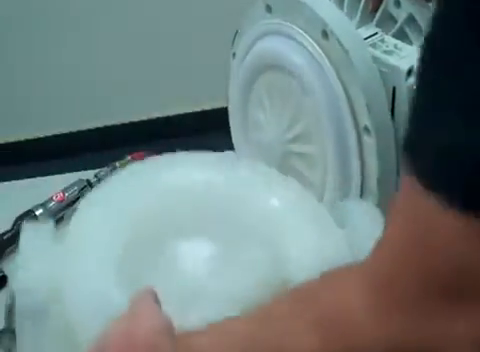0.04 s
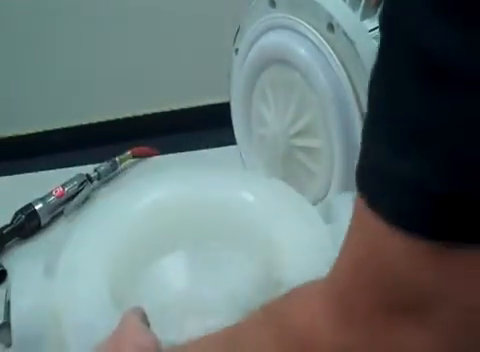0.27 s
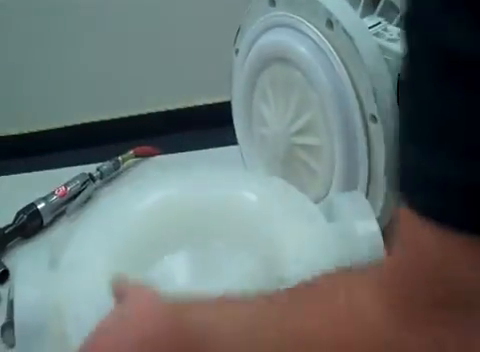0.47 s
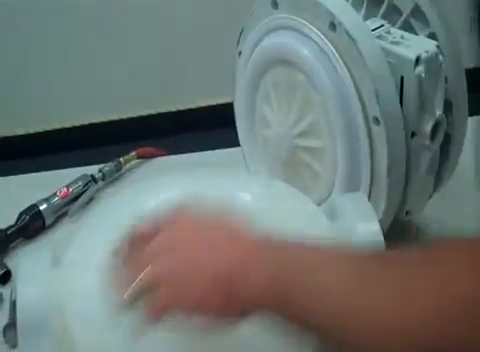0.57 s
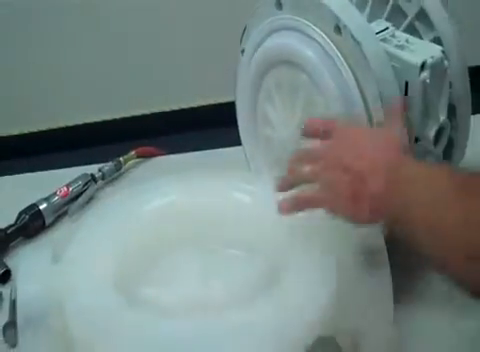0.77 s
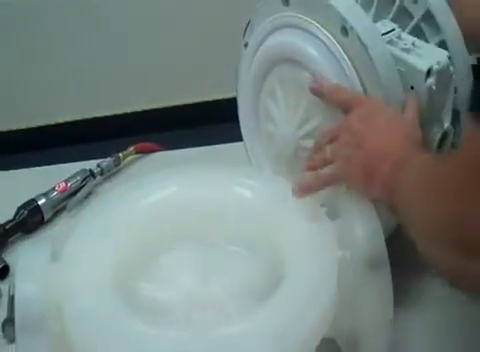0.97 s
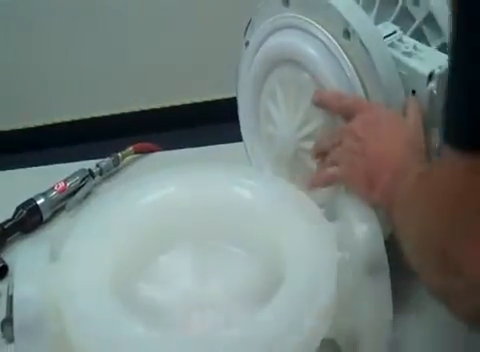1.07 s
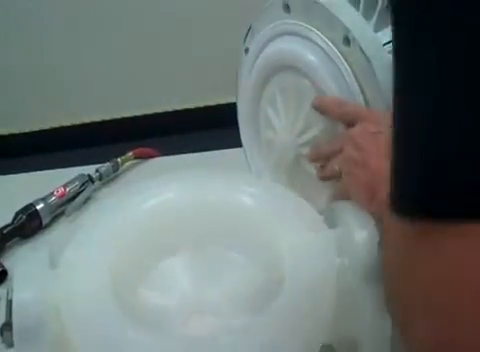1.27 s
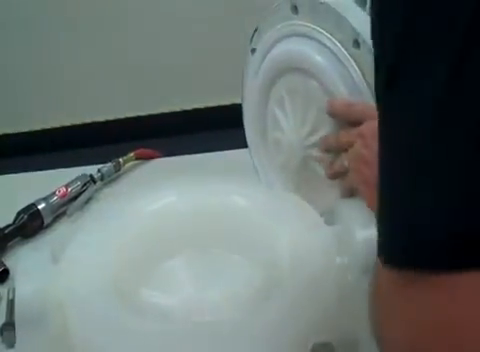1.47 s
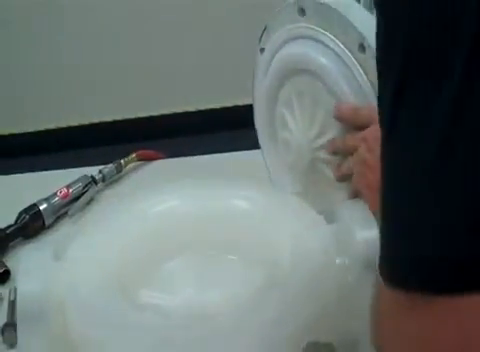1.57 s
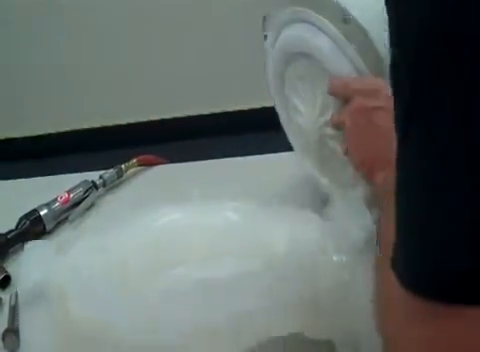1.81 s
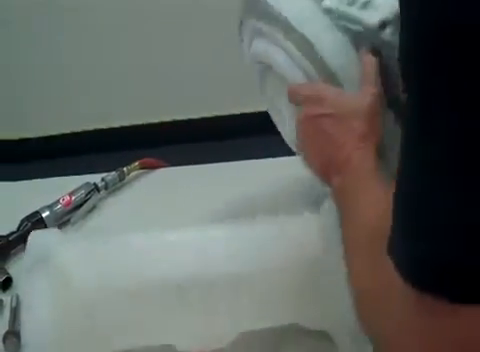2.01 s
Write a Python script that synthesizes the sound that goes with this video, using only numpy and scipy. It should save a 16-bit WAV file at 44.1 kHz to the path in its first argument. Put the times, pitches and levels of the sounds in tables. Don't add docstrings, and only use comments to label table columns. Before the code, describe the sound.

Loud clattering bang of a hard plastic housing landing on a bench, then faint handling taps

```python
import sys
import numpy as np
from scipy import signal
from scipy.fft import rfft, irfft
from scipy.io import wavfile
from scipy.ndimage import uniform_filter1d

SR = 44100
rng = np.random.default_rng(int(sys.argv[2]) if len(sys.argv) > 2 else 0)


def nominal_scale(level):
    x = np.asarray(level, float) / 20
    return 10 ** x


def dump_mix(stems):
    frames = np.atleast_2d(stems).T
    limited = np.clip(frames, -1, 1)
    pcm = np.round(limited * 32767).astype(np.int16)
    wavfile.write(sys.argv[1], SR, pcm)


N = 90404
LEAD = 4410
BLOW_PAN_DB, AIR_PAN_DB = 4.5, 4

# [f/Hz, level per Hz/dB]
BLOW_SPECTRUM = [(30, -19), (120, -11), (500, -3.5), (1900, -1.5), (4000, -9), (8000, -24.5), (13500, -41),
                 (16000, -51.5)]
# [f/Hz, level per Hz/dB]
RUB_SPECTRUM = [(150, -19), (500, 3.5), (1000, 0.5), (1600, 0.5), (3000, -5), (5000, -12), (5800, -21.5),
                (10500, -32), (13000, -54.5)]


def evened(x):
    return x / np.sqrt(np.mean(x ** 2) + 1e-20)


def read(points, hz):
    f, value = np.transpose(points)
    return np.interp(np.log(hz + 1), np.log(f + 1), value)


def add(mix, s, sound):
    part = mix[..., round(s * SR) + LEAD:][..., :sound.shape[-1]]
    part += sound[..., :part.shape[-1]]


def colour(points, tilt_db):
    hz = abs(np.fft.fftfreq(4096, 1 / SR))
    log_gain = np.log(nominal_scale(read(points, hz) + tilt_db * np.log2((hz + 400) / 1400)))
    response = np.fft.ifft(np.exp(np.conj(signal.hilbert(log_gain)))).real[:2048]
    return response / np.linalg.norm(response)


def ring(modes, stretch):
    t = np.arange(SR // 2) / SR
    total = np.zeros(len(t))
    for hz, db, t60 in modes:
        fade = nominal_scale(db - 60 * t / (t60 * stretch))
        total += fade * np.sin(2 * np.pi * hz * t + rng.uniform(0, 2 * np.pi))
    return total


def flutter(x, span):
    wobble = uniform_filter1d(rng.standard_normal(x.shape), span)
    return x * (0.7 + 0.7 * evened(uniform_filter1d(wobble, span)))


def burst(grit, contact, rise):
    u = np.arange(len(grit)) / SR / contact
    push = grit * np.minimum(u / rise, 1) * np.exp(-2 * u)
    return push / np.linalg.norm(push) * 10


def pair(frames, hz, same):
    a, b, c, d = rng.standard_normal((frames, len(hz), 4)).T
    alike = np.clip(read(same, hz), -1, 1)[:, None]
    left, other = a + 1j * b, c + 1j * d
    return np.array([left, alike * left + np.sqrt(1 - alike ** 2) * other])


def panned(x, pan_db):
    return x * nominal_scale(np.array([[pan_db / 2], [-pan_db / 2]]))


def air():
    # [f/Hz, level per Hz/dB]
    air_spectrum = [(20, -9), (100, -11), (250, -2.5), (500, -4), (1500, -11.5), (5000, -13.5), (9000, -22),
                    (12500, -33.5), (15000, -52)]
    # [f/Hz, likeness 0-1]
    air_same = [(60, 1), (240, 1), (940, 0.84), (3710, 0.26), (14700, 0.15)]
    air_db, patchy_db, swell_db = -57, -1.5, -1.4
    frames, hz = N // 256 + 8, np.fft.rfftfreq(1024, 1 / SR)
    patches = uniform_filter1d(rng.standard_normal((frames, 513)), 12, 0)
    patches = evened(uniform_filter1d(patches, 14, 1)).T
    swell = evened(uniform_filter1d(rng.standard_normal(frames), 20))
    gain_db = read(air_spectrum, hz)[:, None] + patchy_db * patches + swell_db * swell
    z = pair(frames, hz, air_same) * nominal_scale(gain_db)
    hiss = signal.istft(z, nperseg=1024, noverlap=768)[1][:, :N]
    return panned(nominal_scale(air_db) * evened(hiss), AIR_PAN_DB)


def machine():
    # [f/Hz, level/dB]
    hum_tones = [(58.5, -5.5), (118, -2.5), (173, -7.5), (361, -7)]
    # [f/Hz, level per Hz/dB]
    rumble_spectrum = [(15, -2.5), (40, -4.5), (130, -8), (250, -14.5), (500, -38.5)]
    # [t/s, level/dB]
    load = [
        (0, -73),
        (.3, -73.5),
        (.93, -66.5),
        (.99, -55),
        (1.36, -58.5),
        (1.42, -56.5),
        (1.82, -61.5),
        (1.88, -56),
        (2.05, -59.5),
    ]
    hum_db, rumble_db = -4.0, -4.5
    t = np.arange(N) / SR
    hum = evened(sum(nominal_scale(db) * np.sin(2 * np.pi * (hz * t + rng.random())) for hz, db in hum_tones))
    rumble = evened(signal.fftconvolve(rng.standard_normal(N), colour(rumble_spectrum, 0))[:N])
    strength = nominal_scale(np.interp(t, *np.transpose(load)))
    return panned(strength * (nominal_scale(hum_db) * hum + nominal_scale(rumble_db) * rumble), AIR_PAN_DB)


def room(x, stretch=1):
    # [f/Hz, t60/s]
    room_t60 = [(40, 0.17), (90, 0.25), (210, 0.46), (560, 0.28), (1470, 0.24), (3880, 0.21), (8000, 0.15),
                (12000, 0.065)]
    # [f/Hz, likeness 0-1]
    room_same = [(60, 0.94), (500, 0.94), (1600, 0.86), (4000, 0.35), (8000, 0.14), (14000, 0.37)]
    late_db, late_stretch = -23.5, 3.26
    hz, t = np.fft.rfftfreq(256, 1 / SR), np.arange(900) * 64 / SR
    fall_db = -60 * t / read(room_t60, hz)[:, None] / stretch
    fall = nominal_scale(fall_db) + nominal_scale(late_db + fall_db / late_stretch)
    tail = signal.istft(pair(len(t), hz, room_same) * fall, nperseg=256, noverlap=192)[1]
    tail = tail * np.clip(np.arange(tail.shape[1]) / SR / 0.0037, 0, 1)
    return signal.fftconvolve(x, tail / np.linalg.norm(tail[0]), axes=1)[:, :x.shape[1]]


def thud():
    # [f/Hz, level per Hz/dB]
    thud_spectrum = [(40, -12.5), (200, -2), (500, -1.5), (900, -2.5), (1800, -15.5), (4500, -30.5),
                     (11000, -43.5)]
    # [f/Hz, level/dB, t60/s]
    thud_ring = [(125, -41.5, 0.27), (199.6, -38, 0.48), (321, -33.5, .3), (485, -28.5, 1),
                 (516, -36.5, .45), (585.3, -35, 0.39), (884.4, -36.5, 0.12), (1140, -35, 0.4)]
    thud_s, thud_db, contact_s = -0.074, -11, 0.033
    rock_hz, octaves_per_s, rock_db, rock_t60_s = 316, 9, -34, 0.3
    out, hum = np.zeros((2, N + LEAD))
    push = burst(rng.standard_normal(4000), contact_s, 0.069)
    add(out, thud_s, nominal_scale(thud_db) * signal.fftconvolve(push, colour(thud_spectrum, 3.3)))
    t = np.arange(SR // 4) / SR
    cycles = np.cumsum(rock_hz * 2 ** (-octaves_per_s * t)) / SR
    rock = nominal_scale(rock_db - 60 * t / rock_t60_s) * np.sin(2 * np.pi * cycles)
    add(hum, 0, flutter(rock, span=300))
    add(hum, 0, flutter(ring(thud_ring, 0.87), span=400))
    return room(panned(out, BLOW_PAN_DB), stretch=1.4) + panned(hum, BLOW_PAN_DB)


def slides():
    # [start t/s, length/s, level/dB, brightness per octave/dB]
    strokes = [(0.8138, 0.047, -55.5, 6), (0.8523, 0.046, -54, 2), (0.8945, 0.028, -54, 1),
               (1.053, 0.049, -55, 5.5), (1.2427, 0.12, -62.5, 2.5), (1.4172, 0.026, -52.5, 4.5),
               (1.492, 0.033, -57, -5), (1.5382, 0.051, -45, 1), (1.537, .03, -58, 11),
               (1.574, 0.037, -62, -1.5), (1.5993, 0.063, -50.5, -0.5), (1.6518, 0.058, -60.5, -16),
               (1.8472, 0.059, -65.5, 6.5), (0.9716, 0.1, -66.5, -11.5), (1.4697, 0.14, -56, -22),
               (0.7785, 0.1, -63.5, -18.5), (0.0196, 0.11, -61.5, 12.5), (0.0913, 0.11, -60, 11.5),
               (1.76, 0.091, -67, 3)]
    # [f/Hz, width/Hz, level/dB]
    shell_modes = [(695, 60, -4), (980, 31, -3.5), (1320, 30, 0.5), (1650, 55, 3.5), (1870, 91, 3),
                   (2620, 60, 0), (3000, 120, -5.5), (4550, 100, -10.5)]
    slips_per_s, slip_spread_db, shell_db, pan_db = 6700, 1, -0.5, 6.5
    shell = ring([(hz, db, 1.6 / wide) for hz, wide, db in shell_modes], 1)[:8000]
    shell = nominal_scale(shell_db) * shell / np.linalg.norm(shell)
    chance = rng.random((len(strokes), 3, 6000))
    for_all = np.zeros((2, N + LEAD))
    for (s, length, db, tilt_db), (when, size, sign) in zip(strokes, chance):
        u = np.arange(6000) / SR / length
        slip_size = nominal_scale(-slip_spread_db * np.log(size + 0.0067))
        slips = (when < slips_per_s / SR) * slip_size * np.sign(sign - 0.5)
        slips = evened(slips) * np.sin(np.pi * np.minimum(u, 1) ** 0.7)
        sides = np.array([slips, slips + 0.5 * np.roll(slips, 37)])
        rub = signal.fftconvolve(sides, colour(RUB_SPECTRUM, tilt_db)[None], axes=1)
        hollow = signal.fftconvolve(sides, shell[None], axes=1)
        add(for_all, s, nominal_scale(db) * panned(rub, pan_db))
        add(for_all, s, nominal_scale(db) * panned(hollow, pan_db))
    return for_all


def taps():
    # [t/s, peak level/dB, ping f/Hz, ping share/dB, brightness per octave/dB]
    touches = [(0.4997, -43, 6095, -9, 3.5), (0.676, -56.5, 2095, 11, -1), (0.7296, -53.5, 7455, -16, 11),
               (0.818, -53, 3080, 5, 8), (.9393, -42.5, 3214, -5, 8.5), (1.15, -55.5, 1520, 0, 2),
               (1.262, -51.5, 2210, -2, 7), (1.3016, -55, 4100, 8, 12.5), (1.3228, -45, 3220, 6.5, 7.5),
               (1.3444, -57, 4230, -1, 7), (1.3628, -49, 4130, 2, 7), (1.4146, -38, 1914, -11, 3),
               (1.415, -43, 4105, 3, 5), (1.491, -54, 189, 13, -15), (1.4948, -42.5, 2040, 4, 0),
               (1.5394, -49.5, 4300, 9, 7.5), (1.575, -60, 4500, -12, 17.5), (1.6116, -51, 1650, 8, -2),
               (1.7404, -56.5, 1920, 1, -5), (1.867, -56.5, 544, 6, 12.5), (1.898, -66, 526.4, 5.5, 1)]
    ping_t60_s, snap_t60_s, pan_db = 0.027, 0.04, 3.5
    out, t = np.zeros((2, N + LEAD)), np.arange(3000) / SR
    chance = rng.standard_normal((len(touches), 2, 3000))
    snap_shape = np.minimum(t / 0.000786, 1) * nominal_scale(-60 * t / snap_t60_s)
    for (s, db, hz, ping_db, tilt_db), grit in zip(touches, chance):
        fade = nominal_scale(ping_db - 60 * t / ping_t60_s * (hz / 3000) ** 0.71)
        ping = fade * np.sin(2 * np.pi * hz * t) * np.minimum(t * hz / 4, 1)
        noise = (grit[0] + 0.5 * grit) * snap_shape
        snap = signal.fftconvolve(noise, colour(RUB_SPECTRUM, tilt_db)[None], axes=1)[:, :3000]
        add(out, s, panned(nominal_scale(db) * (ping + snap), pan_db))
    return out


def squeeze():
    squeeze_db, rise_db_per_s = -18.5, 4499.5
    hiss = signal.fftconvolve(rng.standard_normal(3000), colour(BLOW_SPECTRUM, -2))[2000:2441]
    return evened(hiss) * nominal_scale(squeeze_db - rise_db_per_s * np.arange(441)[::-1] / SR)


def blows():
    # [t/s, strength/dB, brightness per octave/dB, contact/s]
    hits = [
        (0.0217, -26, 2, 0.0029),
        (0.2092, 7, -2, 0.014),
        (0.218, 3, -1, 0.01),
        (0.23, 0.5, 1, 0.013),
        (.248, -2.5, 2, .015),
        (0.265, -9, 1, 0.011),
        (.288, -11.5, 2.5, 0.008),
        (.303, -15.5, 1, .008),
    ]
    ringing_db = [-20.5, -1, -6, -9.5, -9.5, -10, -9, -12.5]
    # [f/Hz, level/dB, t60/s]
    housing_modes = [(957, -2, 0.17), (1053, 0, 0.094), (1115, -0.5, 0.13), (1195, 3, 0.13),
                     (1319.5, 0.5, 0.13), (1584, -4, 0.11), (1639, 0.5, 0.083), (1865, -2.5, 0.15),
                     (2330, -6.5, 0.13), (2428, 0, 0.14), (2795, -6, .1), (3425, -11.5, 0.14),
                     (4350, -12.5, 0.12)]
    # [f/Hz, level/dB, t60/s]
    bench_modes = [(99, -15.5, 0.091), (147.5, -2, 0.16), (202, -4, 0.2), (289, -3, 0.14),
                   (398, 4.5, 0.098), (450.5, 2, 0.11), (479.8, -2.5, 0.17), (588.1, 3, 0.071),
                   (747, -1, 0.12)]
    # [f/Hz, level/dB, t60/s]
    steel_modes = [(7620, -54, .3), (8210, -47, .2), (9050, -44, .18), (9830, -37, .09), (9990, -35, 0.2),
                   (10130, -39, .12), (10480, -43, 0.27), (10900, -40, .07), (11710, -39, 0.07),
                   (12350, -35, .1), (14100, -37, .06)]
    housing_db, room_db, boom_room_db = -5, -3.5, -11
    crack, boom, shaken = np.zeros((3, N + LEAD))
    body, bench = ring(housing_modes, 0.59), ring(bench_modes, 0.74)
    body = 10 * nominal_scale(housing_db) * body / np.linalg.norm(body)
    bench = 10 * bench / np.linalg.norm(bench)
    soft_start = np.minimum(np.arange(len(bench)) / SR / 0.001, 1)
    chance = rng.standard_normal((len(hits), 2000))
    for (s, db, tilt_db, contact), ring_db, grit in zip(hits, ringing_db, chance):
        push = nominal_scale(db) * burst(grit, contact, 0.04 if db > 5 else 0.3)
        add(crack, s, signal.fftconvolve(push, colour(BLOW_SPECTRUM, tilt_db)))
        add(boom, s, nominal_scale(db + ring_db) * (bench + body) * soft_start)
        add(shaken, s, push * (db > -15))
    add(crack, 0.209 - 0.01, squeeze())
    steel = np.array([ring(steel_modes, 1), -ring(steel_modes, 1)]) / 10
    steel = signal.fftconvolve(shaken[None], steel, axes=1)[:, :N + LEAD]
    direct = panned(crack + flutter(steel, span=60), BLOW_PAN_DB)
    echo = room(direct + nominal_scale(boom_room_db) * boom)
    return direct + panned(boom, 3.5) + nominal_scale(room_db) * echo


def ported(x):
    # [f/Hz, phase/radians]
    ports = [(20, 0), (3500, 0.38), (5770, 0.7), (7000, 2.5), (9500, 3.5), (15000, -0.2)]
    lead = np.exp(0.5j * read(ports, np.fft.rfftfreq(x.shape[1], 1 / SR)))
    return irfft(rfft(x) * np.array([lead, 1 / lead]), x.shape[1])


def scene():
    hand_room_db = -6.5
    drop = ported(blows()) + thud()
    hand = taps() + slides()
    hand = hand + nominal_scale(hand_room_db) * room(hand)
    return (drop + hand)[:, LEAD:] + air() + machine()


def roll_off(x):
    return signal.sosfilt(signal.butter(12, 15260, fs=SR, output="sos"), x)


def record(dry):
    ceiling = 0.96
    return roll_off(np.clip(dry, -ceiling, ceiling))


dry = scene()
out = record(dry)
dump_mix(out)
```